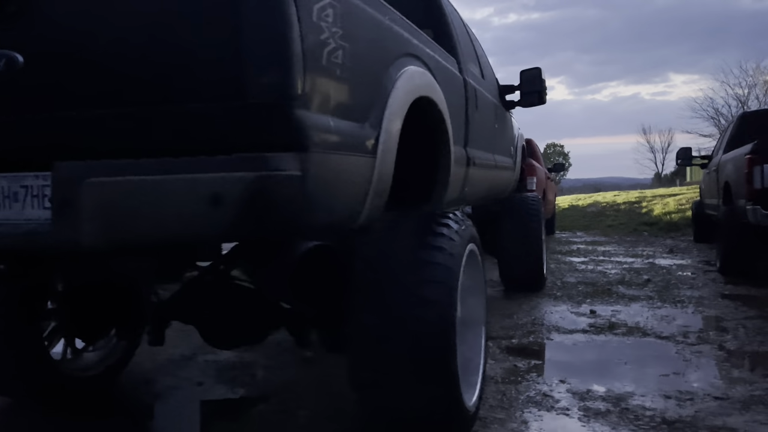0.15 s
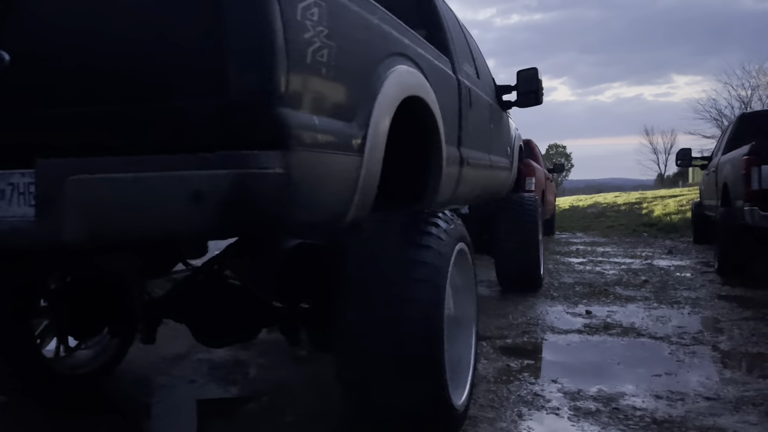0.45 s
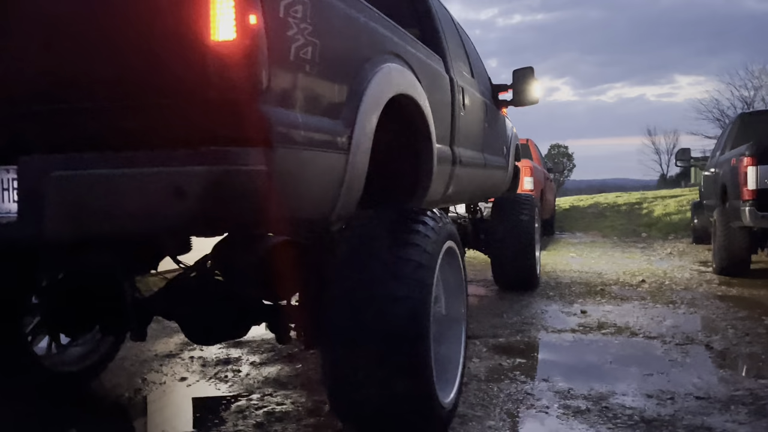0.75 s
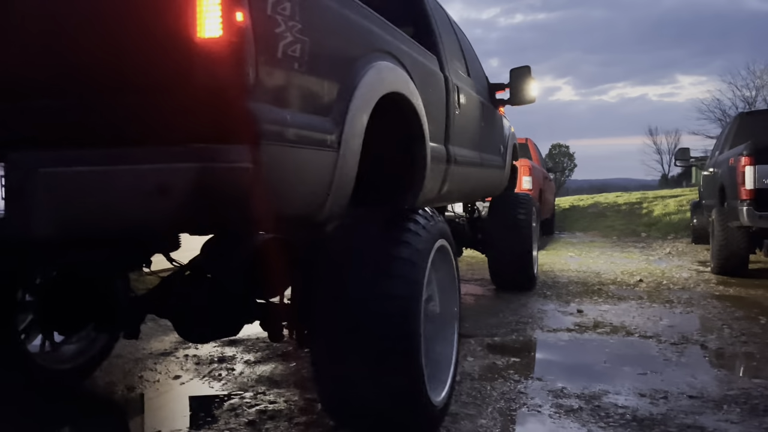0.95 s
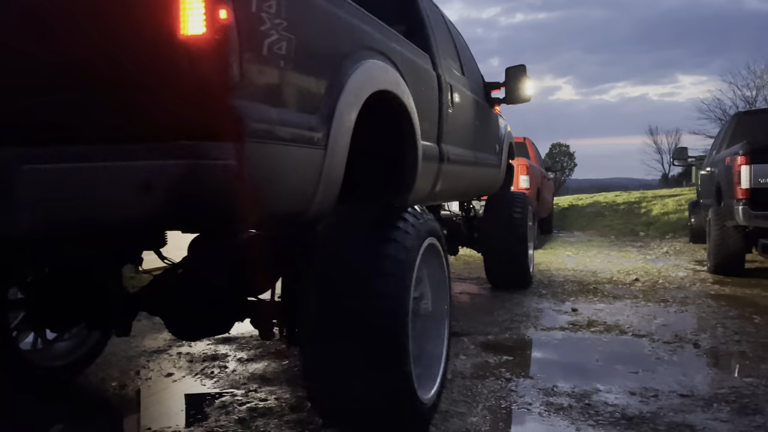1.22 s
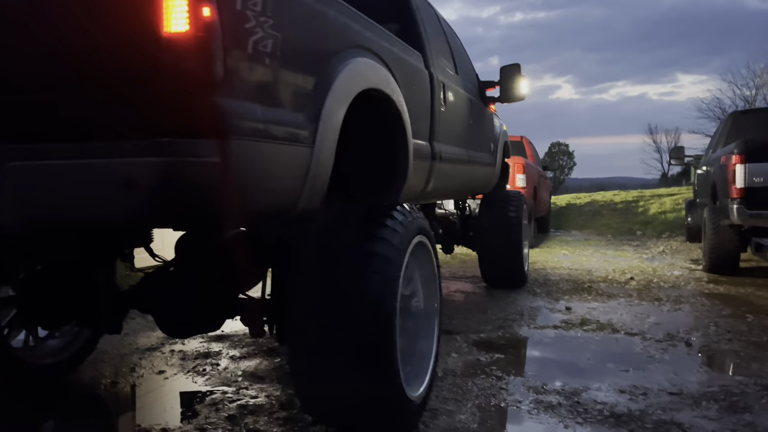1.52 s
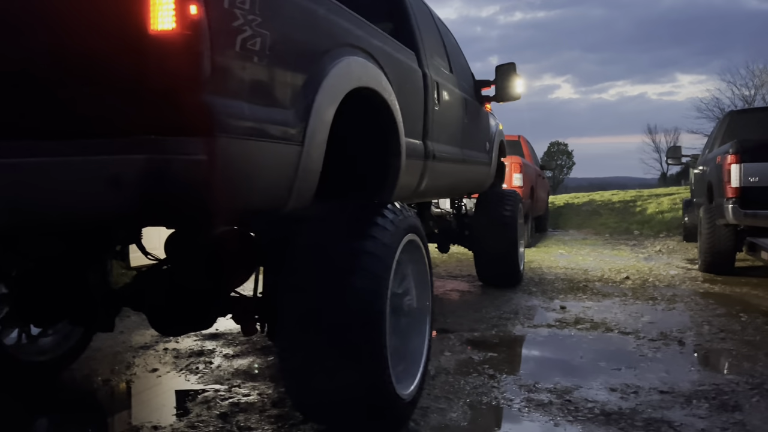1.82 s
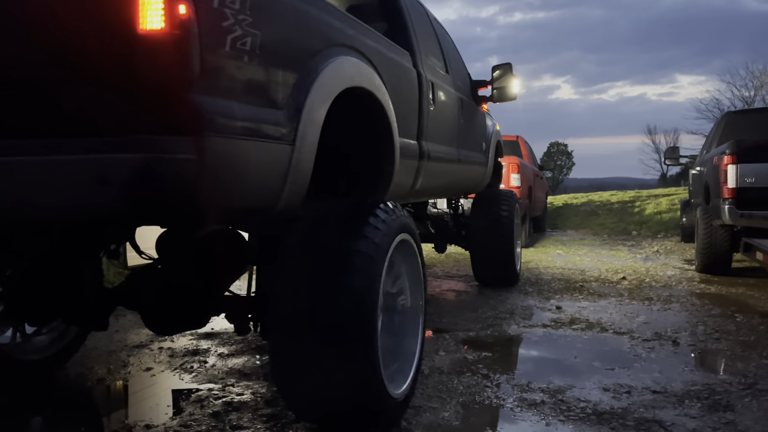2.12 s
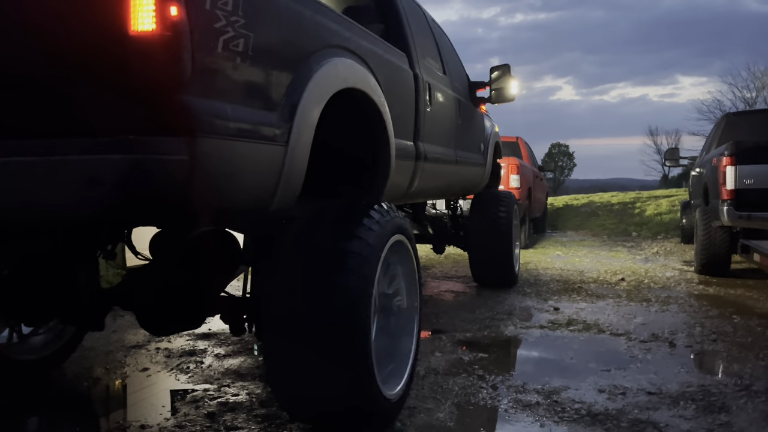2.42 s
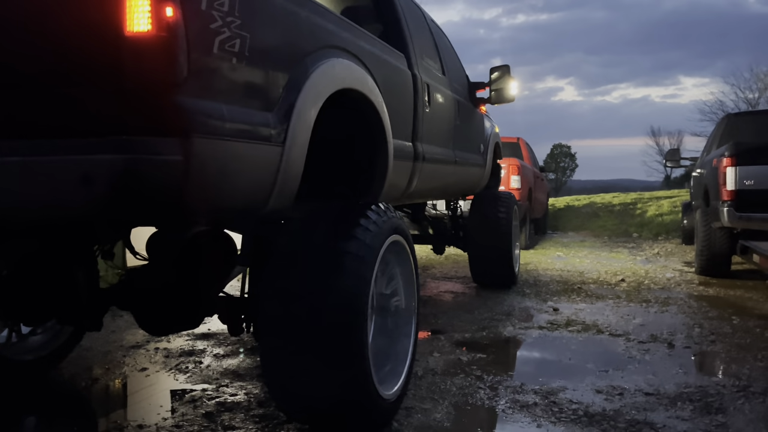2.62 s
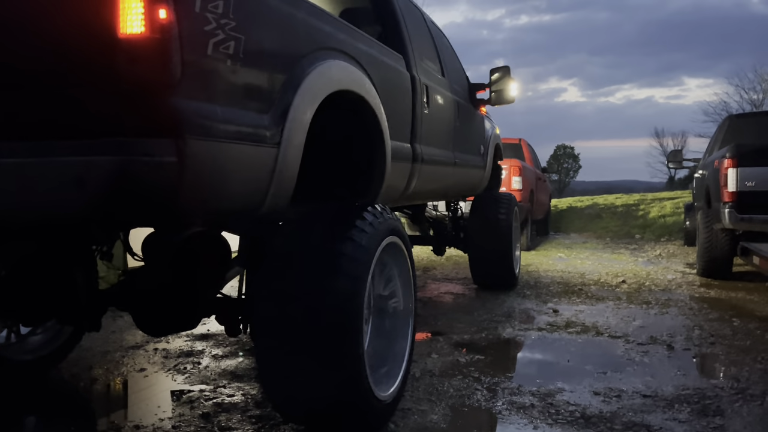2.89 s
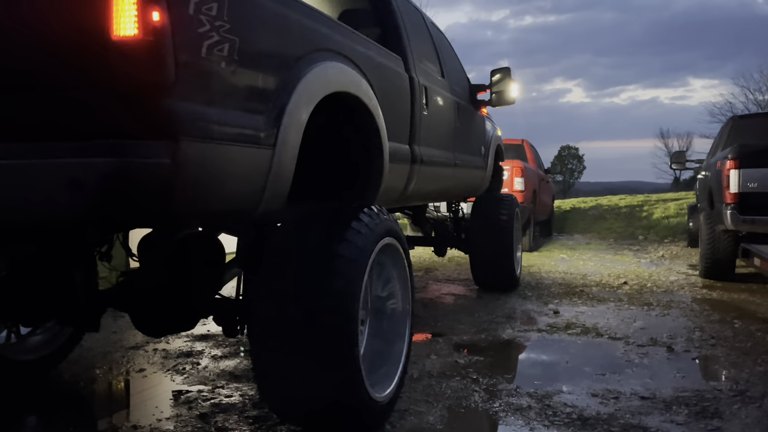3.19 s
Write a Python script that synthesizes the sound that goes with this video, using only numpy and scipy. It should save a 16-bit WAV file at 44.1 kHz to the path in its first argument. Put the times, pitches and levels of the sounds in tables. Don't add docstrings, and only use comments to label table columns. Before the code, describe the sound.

Diesel truck engine cold start: short grinding starter, harsh first firings, steady lumpy clattering idle.

```python
import sys
import numpy as np
from scipy import signal
from scipy.fft import rfft, irfft, next_fast_len
from scipy.io import wavfile
from scipy.ndimage import uniform_filter1d

SR = 44100
rng = np.random.default_rng(int(sys.argv[2]) if len(sys.argv) > 2 else 0)


def unload_wav(signal):
    wavfile.write(
        sys.argv[1],
        SR,
        np.round(np.clip(np.atleast_2d(signal).T, -1, 1) * 32767).astype(np.int16),
    )


def rack_gain(trim_db):
    fader = np.asarray(trim_db, float)
    return 10 ** (fader / 20)


N = 147735
T = np.arange(N) / SR
M = next_fast_len(N + 8192)
HZ = np.fft.rfftfreq(M, 1 / SR)
CATCH_S = .396

# [t/s, grind level/dB, puff level/dB]
STROKES = [
    (.0, 0.5, -23.5),
    (0.093, 1.5, -1.5),
    (0.191, 0.5, -14.5),
    (0.279, 1, -13),
]
# [f/Hz, phase/rad]
ENGINE_LEAD = [(0, 0), (3190, 3.0), (4570, 7.3), (7150, 7.5), (8700, 6.1), (9730, 3.5), (11000, 2.6),
               (11800, -0.9)]


def evened(x):
    return x / np.sqrt(np.mean(x ** 2) + 1e-20)


def evened_response(response):
    return response / np.sqrt(np.mean(abs(response) ** 2))


def curve(points, at):
    return np.interp(at, *np.transpose(points))


def log_curve(points, at_hz):
    f, value = np.transpose(points)
    return np.interp(np.log(at_hz + 1), np.log(f), value)


def body(modes, sign=1):
    return sum(sign ** k * rack_gain(db) / (1 + 2j * (HZ - hz) / width)
               for k, (hz, width, db) in enumerate(modes))


def panels(modes):
    # [f/Hz, width/Hz, depth 0-1 (negative lifts)]
    ground_dips = [(215, 40, .6), (560, 120, .3), (680, 90, .75), (1180, 120, .65), (1560, 90, .4),
                   (2200, 250, .5), (3250, 450, .55), (7600, 1800, .35), (9200, 800, -.9)]
    panel_db, panel_width_hz = 1.8, 40
    low_cut_hz, high_cut_hz = 240, 5500
    fine = evened(uniform_filter1d(rng.standard_normal(len(HZ)), size=int(panel_width_hz / HZ[1])))
    dips = np.prod([1 - depth / (1 + 2j * (HZ - hz) / width) for hz, width, depth in ground_dips], axis=0)
    low_cut = 1 + (low_cut_hz / (HZ + 1)) ** 8
    high_cut = 1 + (HZ / high_cut_hz) ** 2
    return body(modes) * dips * rack_gain(panel_db * fine) / low_cut / high_cut


def clicks(times, db):
    out = np.zeros(N)
    np.add.at(out, np.clip((np.asarray(times) * SR).astype(int), 0, N - 1), rack_gain(db))
    return out


def bursts(times, db, rise_s, fall_s):
    t = T[:4000]
    blow = np.minimum(t / rise_s, 1) * np.exp(-t / fall_s)
    return signal.oaconvolve(clicks(times, db), blow)[:N]


def pair(left, right, lead):
    # [f/Hz, left-right level/dB]
    lean = [(60, 1.0), (130, 1.0), (270, 1.0), (570, 2.0), (1220, 2.5), (2580, -4.5), (5480, -2.0),
            (11600, 0.5)]
    tilt = rack_gain(log_curve(lean, HZ) / 2) * np.exp(.5j * curve(lead, HZ))
    return irfft(np.array([left * tilt, right / tilt]), M)[:, :N]


def ports(envelope, response, lead):
    # [f/Hz, likeness 0-1]
    likeness = [(60, .999), (250, .95), (1000, .88), (2500, .9), (5000, .6), (9000, .8)]
    noise = rng.standard_normal((2, N)) * envelope
    a, b = rfft(noise, M) * evened_response(response)
    same = np.clip(log_curve(likeness, HZ), 0, 1)
    return pair(a, same * a + np.sqrt(1 - same ** 2) * b, lead)


def crank_time(firings):
    # [t/s, firing rate/Hz]
    speed = [(.6, 44.95), (.67, 44.74), (.75, 42.51), (.9, 44.06), (1.1, 45.58), (1.4, 46.57), (1.7, 47.06),
             (1.9, 46.85), (2.1, 45.31), (2.3, 44.56), (2.8, 44.96), (3.35, 44.95)]
    running = T >= .5984
    turns = np.cumsum(curve(speed, T) * running) / SR
    return np.interp(firings[firings < turns[-1]], turns[running], T[running])


def crank_hum():
    return ports((T < CATCH_S) * rack_gain(-28.5), body([(72, 50, 0)]) ** 2, ENGINE_LEAD)


def exhaust_rumble():
    u = 1j * HZ / 40
    response = u / (1 + u) * body([(130, 70, 0)]) ** 2
    return ports((T > CATCH_S) * rack_gain(-32), response, ENGINE_LEAD)


def gear_whine():
    # [start t/s, length/s, from f/Hz, to f/Hz, level/dB]
    whines = [(.165, .04, 3800, 4250, -38), (.245, .04, 3850, 4150, -36), (.3, .075, 3750, 4200, -36),
              (.086, .02, 5950, 5950, -35), (.278, .02, 7000, 7000, -39), (.0, .09, 1030, 1000, -35),
              (.085, .06, 810, 805, -34), (.265, .07, 890, 930, -38), (.0, .07, 2400, 2150, -37),
              (.09, .07, 1480, 1300, -36), (.1, .065, 2900, 2450, -37), (.195, .05, 3150, 2800, -37),
              (.19, .07, 1500, 1400, -38), (.278, .06, 3250, 2750, -37)]
    waver_hz, lift_db = 170, 5
    whine = np.zeros(N)
    for s, length, from_hz, to_hz, db in whines:
        u = np.clip((T - s) / length, 0, 1)
        waver = waver_hz * evened(uniform_filter1d(rng.standard_normal(N), size=40))
        hz = (from_hz + (to_hz - from_hz) * u) * (1 + waver / 4000)
        swell = np.sqrt(abs(np.sin(np.pi * u)))
        whine += np.sqrt(2) * rack_gain(db + lift_db) * swell * np.sin(2 * np.pi * np.cumsum(hz) / SR)
    return whine


def starter():
    # [f/Hz, width/Hz, level/dB]
    housing = [(367, 140, 3), (920, 52, -34), (1174, 60, 6), (1540, 270, 9), (2750, 150, -8),
               (3120, 520, 16), (3930, 390, 2), (5710, 1640, 9.5), (7130, 860, 8.5), (9670, 870, 10.5)]
    # [f/Hz, phase/rad]
    crank_lead = [(0, 0), (1640, 0.6), (3010, -4.0), (4910, -6.3), (5940, -0.1), (7750, 1.5), (9910, -3.5),
                  (11800, -0.5)]
    grind_db, rest_db = -22, -7
    rise_s, hold_s, fall_s = .0014, .045, .03
    grind = rack_gain(rest_db) * np.clip((CATCH_S + .05 - T) / .05, 0, 1)
    for s, db, _ in STROKES:
        t = T - s
        fall = np.exp(-np.clip(t - hold_s, 0, 9) / fall_s)
        grind = np.maximum(grind, rack_gain(db) * np.clip(t / rise_s, 0, 1) * fall)
    whine = rfft(gear_whine(), M)
    return ports(rack_gain(grind_db) * grind, panels(housing), crank_lead) + pair(whine, whine, crank_lead)


def firing_puffs():
    # [puff level/dB, runner lag/ms]
    cylinders = [(-5.2, -10.1), (-1.4, -8.5), (0, -11.1), (-.5, -8.3), (-3.6, -7.7), (.2, -11.5),
                 (-1.5, -8.6), (-.8, -9.8)]
    # [t/s, factor]
    unevenness = [(.6, 1.25), (1.1, 1), (3.35, 1.02)]
    # [t/s, level/dB]
    catch_puffs = [
        (.404, -3),
        (.439, 2.3),
        (.462, -8),
        (.487, -9),
        (.499, -6.5),
        (.520, -3),
        (.545, .3),
        (.566, .4),
    ]
    spread_db = .7
    at = crank_time(np.arange(200))
    db, lag_ms = np.array(cylinders)[np.arange(len(at)) % 8].T
    uneven = curve(unevenness, at)
    lag_ms = lag_ms.mean() + (lag_ms - lag_ms.mean()) * uneven
    db = db * uneven + spread_db * rng.standard_normal(len(at))
    return clicks(at + lag_ms / 1000, db) + clicks(*np.transpose(catch_puffs))


def exhaust():
    # [f/Hz, width/Hz, level/dB]
    pipe = [(48.3, 22.3, -32.3), (73.9, 18.4, -25), (135.4, 14, -37), (178.6, 10, -43), (258, 30, -46),
            (312, 35, -48), (375, 30, -46)]
    # [f/Hz, width/Hz, level/dB]
    exhaust_tone = [(120, 16, 2), (176, 20, 8), (222, 16, -7)]
    low_cut_hz, high_cut_hz, slow_puff_hz = 40, 430, 120
    cycle_s, stroke_puff_s = .178, .0365
    s, _, db = np.transpose(STROKES)
    slow = rfft(clicks(s + stroke_puff_s, db), M) / (1 + (HZ / slow_puff_hz) ** 4)
    puffs = rfft(firing_puffs(), M) + slow
    u = 1j * HZ / low_cut_hz
    low_cut = u ** 2 / (1 + np.sqrt(2) * u + u ** 2)
    tail = puffs * body(pipe, -0.98) * low_cut * SR * cycle_s / 2
    tail *= rack_gain(sum(db * np.exp(-((HZ - hz) / width) ** 2) for hz, width, db in exhaust_tone))
    tail /= 1 + (HZ / high_cut_hz) ** 6
    return pair(tail, tail, ENGINE_LEAD)


def catch_knocks():
    # [t/s, knock level/dB]
    firings = [
        (0.395, 5),
        (0.432, 19),
        (0.464, 17),
        (0.492, 14.5),
        (0.515, 8.5),
        (0.544, 8),
        (0.564, 13),
        (0.584, 2.5),
    ]
    # [f/Hz, width/Hz, level/dB]
    cold_ring = [(337, 71, 8), (804, 90, -12.5), (1395, 1500, 4.5), (2355, 720, 7.5), (2795, 220, 6),
                 (3640, 210, -9), (5400, 520, -9), (9600, 1500, -9)]
    s, db = np.transpose(firings)
    return ports(bursts(s, db - 18.5, .005, .009), panels(cold_ring), ENGINE_LEAD)


def clatter():
    # [crank position/firings, low level/dB, high level/dB]
    knocks = [
        (.1, 1.5, -23.5),
        (1.45, 7, -4),
        (1.95, 2.5, -25),
        (2.5, 5.5, -12),
        (3.6, 6, -2),
        (4.2, 0, -36.5),
        (5.1, -2.5, -41.5),
        (6.45, -2, -1),
        (6.95, 3.5, -7),
        (7.55, 2, -6),
    ]
    # [t/s, peak level/dB, relative valve tick level/dB]
    hard = [(0.609, -26, -10), (0.63, -30.5, -30), (0.679, -23, -18.5), (0.745, -17, -22),
            (0.812, -15, -16), (0.844, -15.5, -2), (0.865, -9.5, -12.5), (0.894, -20, -12),
            (0.94, -5.5, -27), (0.975, -13, -12), (0.994, -20, -18.5), (1.02, -12.5, -9),
            (1.043, -22.5, -8.5), (1.073, -11, -24), (1.107, -11, -13), (1.172, -11, -18),
            (1.217, -11.5, -18), (1.248, -19, -15), (1.281, -6, -19.5), (1.344, -10.5, -10),
            (1.389, -11, -12.5), (1.422, -13.5, -19), (1.453, -10.5, -10.5), (1.517, -13.5, -23),
            (1.561, -17.5, -5), (1.595, -14, -15), (1.622, -12.5, -9.5), (1.679, -16.5, -14.5),
            (1.734, -23.5, -33), (1.793, -12.5, -14.5), (1.855, -28, -21), (1.967, -14.5, -5.5),
            (2.028, -16, -25.5), (2.133, -31, -23), (2.151, -11.5, -20), (2.205, -17, -24),
            (2.255, -11, -9), (2.318, -15, -16.5), (2.345, -7, -23), (2.496, -7.5, -21),
            (2.524, -12.5, -25), (2.566, -9.5, -18.5), (2.585, -7.5, -25), (2.614, -11.5, -16.5),
            (2.678, -10.5, -21), (2.739, -17, -31), (2.755, -9.5, -41), (2.786, -10, -37),
            (2.854, -13.5, -12), (2.879, -8.5, -20), (2.903, -18.5, -16.5), (2.947, -15.5, -14.5),
            (2.97, -11, -12), (3.035, -10, -26), (3.102, -19.5, -25), (3.145, -11, -18),
            (3.213, -13.5, -42), (3.26, -16.5, -16.5), (3.289, -10.5, -19.5), (3.323, -16, -20)]
    # [t/s, level/dB]
    load = [(.38, 12.5), (.6, 6), (.8, 4), (1.3, 2), (2, 2.4), (3.35, 2.5)]
    # [f/Hz, width/Hz, level/dB]
    block_modes = [(300, 26, 0.5), (488, 390, -7), (814, 130, -1.5), (976, 210, -1), (1342, 198, -2.5),
                   (1746, 57, -16)]
    # [f/Hz, width/Hz, level/dB]
    cover_modes = [(2916, 1400, 32), (2470, 51, 20.5), (3777, 400, 20.5), (5260, 400, -3.5),
                   (9300, 3100, 14)]
    spread_db, jitter_s, rise_s = 1.8, .0015, .002
    knock_db, tick_db, gear_low_db, gear_high_db = -26, -29, -29.5, -36
    hard_db, hard_tick_db, blow_db = -8, -7, 13

    place, low_db, high_db = np.tile(knocks, (25, 1)).T
    at = crank_time(place + 8 * (np.arange(len(place)) // len(knocks)))
    jitter, spread, tick_spread = rng.standard_normal((3, len(at)))
    at = at + jitter_s * jitter
    extra = spread_db * spread
    low_db = low_db[:len(at)] + extra + knock_db
    high_db = high_db[:len(at)] + .5 * extra + spread_db * tick_spread + tick_db
    low = bursts(at, low_db, rise_s, .007)
    high = bursts(at, high_db, rise_s, .016)

    s, db, relative_tick_db = np.transpose(hard)
    low = np.hypot(low, bursts(s, db + hard_db, .0006, .004))
    high = np.hypot(high, bursts(s, db + relative_tick_db + hard_tick_db, rise_s, .012))

    running = (T > CATCH_S) * rack_gain(curve(load, T))
    block = panels(block_modes)
    blow = rfft(clicks(s, db + blow_db), M) * evened_response(block)
    return (ports(running * np.hypot(low, rack_gain(gear_low_db)), block, ENGINE_LEAD)
            + pair(blow, blow, ENGINE_LEAD)
            + ports(running * np.hypot(high, rack_gain(gear_high_db)), panels(cover_modes), ENGINE_LEAD))


def scene():
    return crank_hum() + exhaust_rumble() + starter() + exhaust() + catch_knocks() + clatter()


def roll_off(x):
    return signal.sosfilt(signal.butter(12, 12240, fs=SR, output="sos"), x)


def record(dry):
    # [t/s, level/dB]
    openings = [
        (.2, -14),
        (.497, -17),
        (2.38, -6),
        (3.17, -6),
    ]
    limit, edge_hz, closed_db, opening_s = 1.05, 9680, -50, .007
    patch_db, patch_share, patch_length = -6, .4, 1536
    z = rfft(limit * np.tanh(dry / limit), M)
    below = irfft(z * (HZ < edge_hz), M)[:, :N]
    above = irfft(z * (HZ >= edge_hz), M)[:, :N]
    top = irfft(z * ((HZ > 11000) & (HZ < 11600)), M)[:, :N]
    on = 1. * (rng.random(N // patch_length + 1) < patch_share)
    patches = uniform_filter1d(np.repeat(on, patch_length)[:N], size=700)
    opening = rack_gain(closed_db) + sum(rack_gain(db) * np.exp(-((T - s) / opening_s) ** 2) for s, db in openings)
    return roll_off(below + opening * above + rack_gain(patch_db) * patches * top)


dry = scene()
out = record(dry)
unload_wav(out)
```